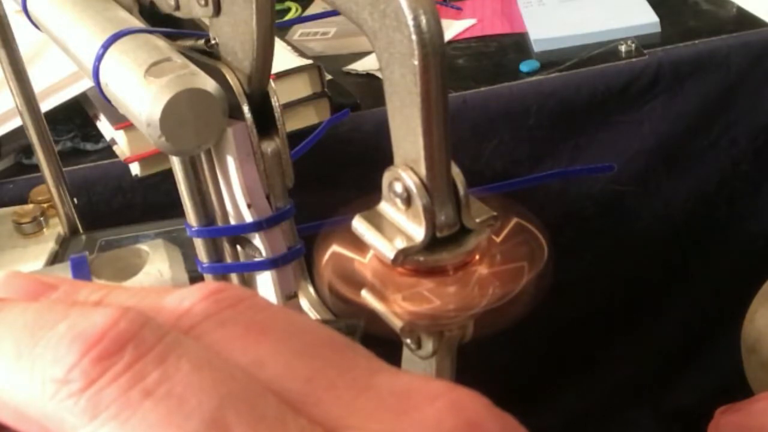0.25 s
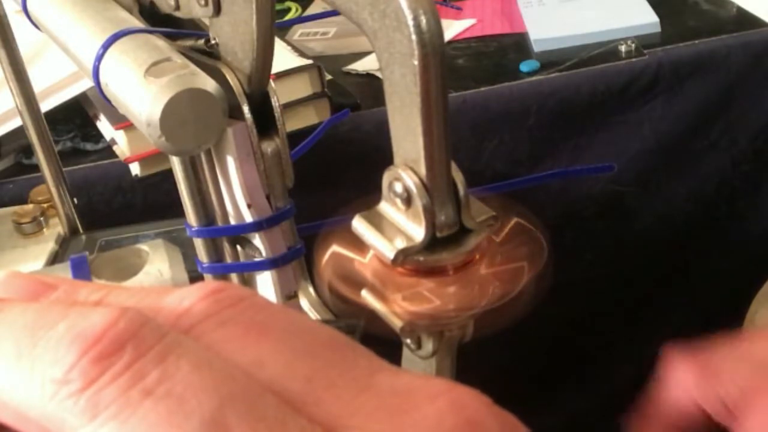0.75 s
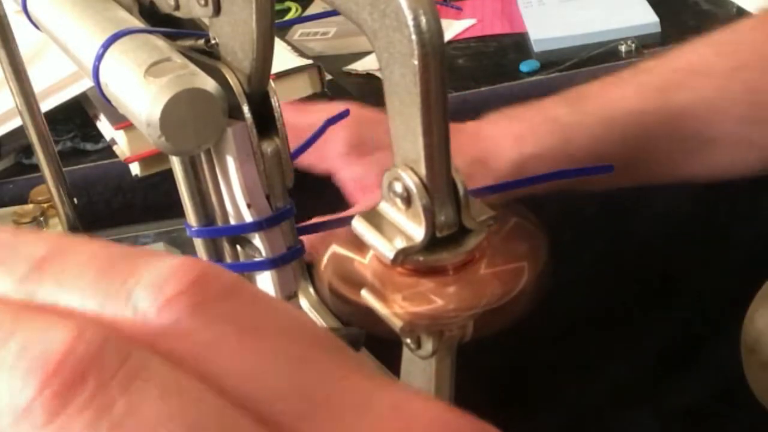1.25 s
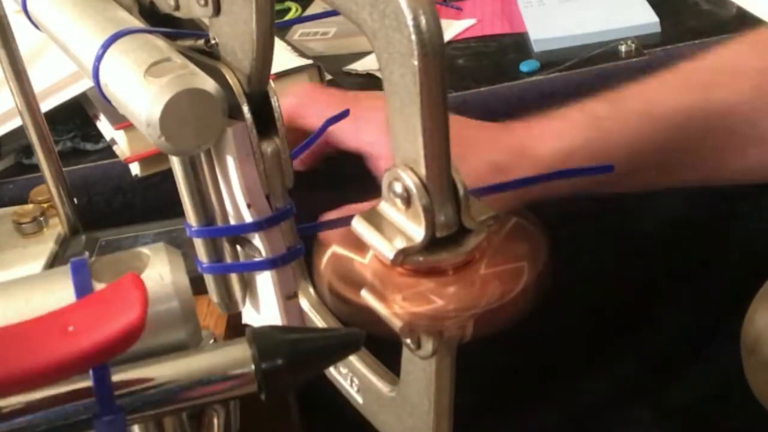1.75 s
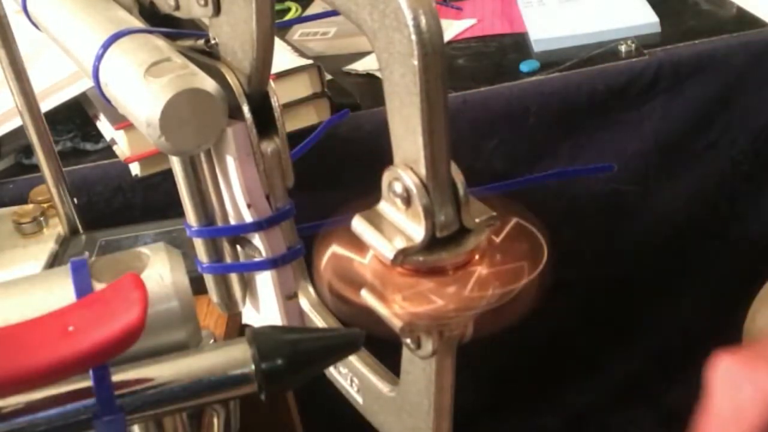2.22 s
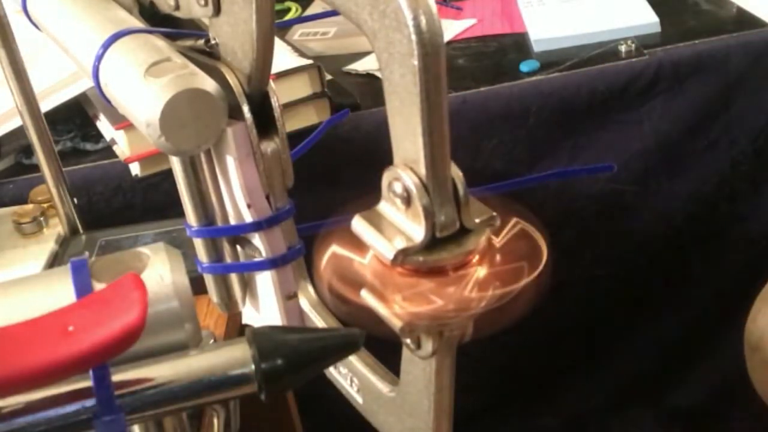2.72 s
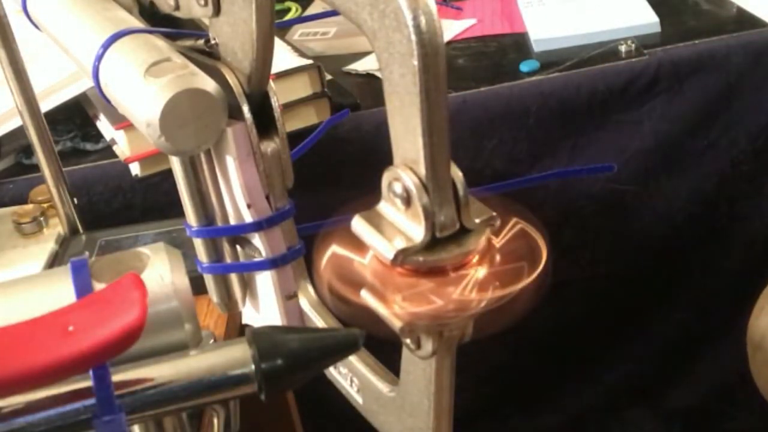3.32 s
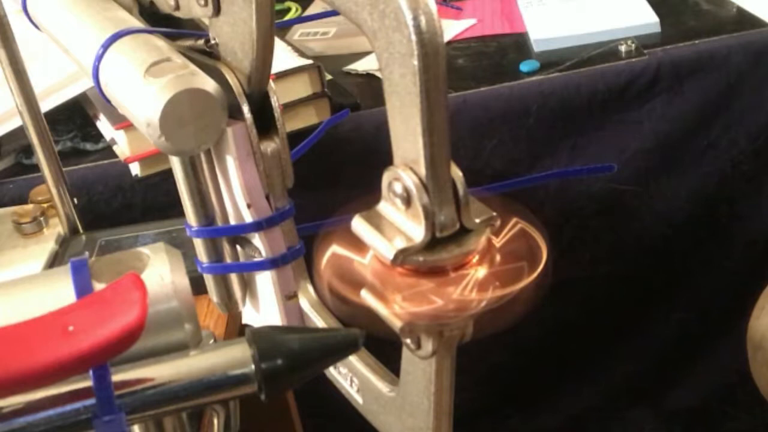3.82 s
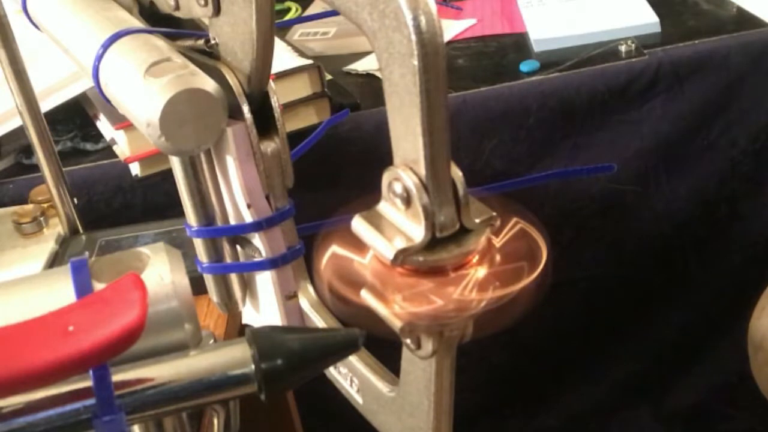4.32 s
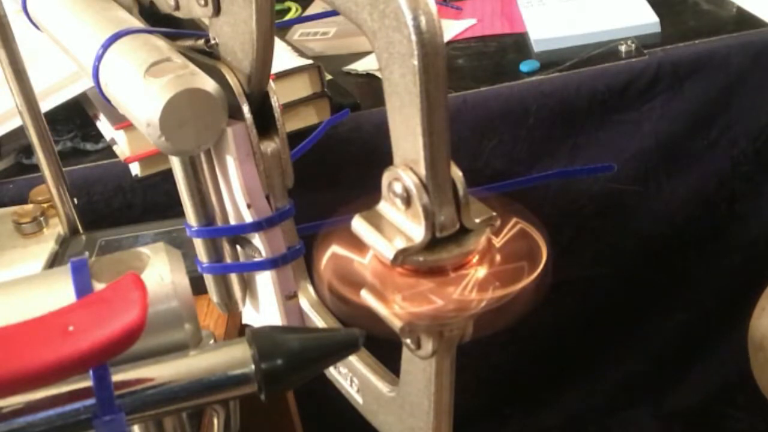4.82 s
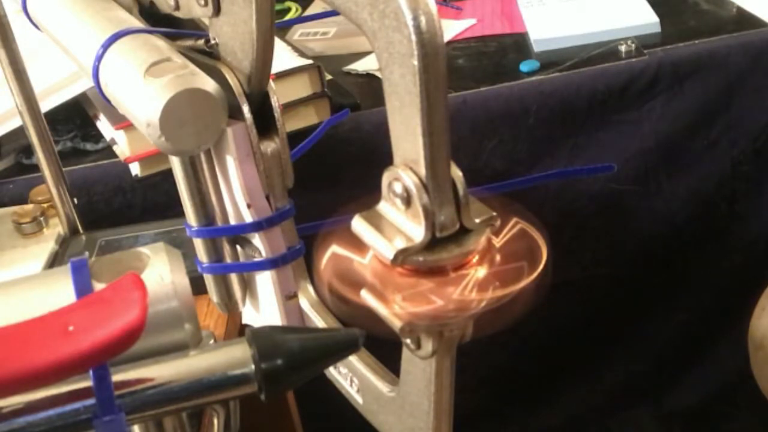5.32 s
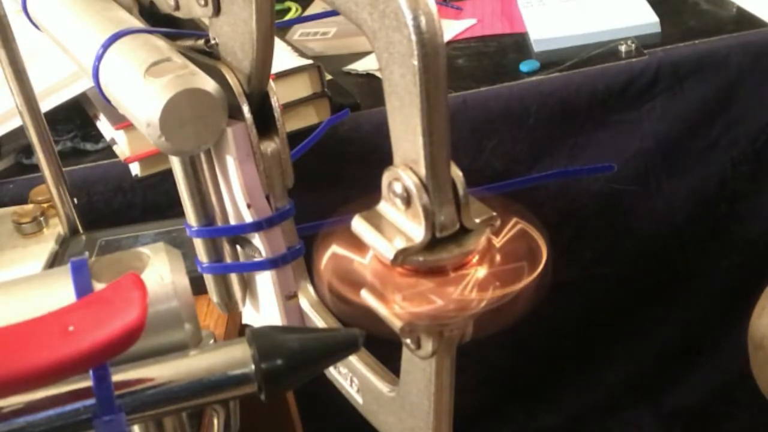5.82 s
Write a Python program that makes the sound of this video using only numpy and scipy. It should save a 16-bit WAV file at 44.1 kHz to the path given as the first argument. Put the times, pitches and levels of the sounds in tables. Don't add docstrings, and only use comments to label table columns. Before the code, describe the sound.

A loud air jet hisses onto a whirring metal spinner, cuts off with two small ticks, leaving a quiet steady hum and faint bearing whine.

```python
import sys
import numpy as np
from scipy import signal
from scipy.fft import rfft, irfft
from scipy.io import wavfile
from scipy.ndimage import uniform_filter1d

SR = 44100
rng = np.random.default_rng(int(sys.argv[2]) if len(sys.argv) > 2 else 0)


def output_pcm(signal):
    pcm = np.clip(np.atleast_2d(signal).T, -1, 1) * 32767
    wavfile.write(sys.argv[1], SR, np.round(pcm).astype(np.int16))


def invert_db(level):
    return 10 ** (np.asarray(level, dtype=float) / 20)


N = 267246
T = np.arange(N) / SR

JET_SHUT_S = 1.1755
GAIN_SETTLES_S = 3.06
CAGE_TURNS = .29575


def unit(x):
    return x / np.sqrt(np.mean(x ** 2))


def walk(rate_hz):
    k = max(int(SR / rate_hz), 1)
    return unit(uniform_filter1d(uniform_filter1d(rng.standard_normal(N), k), k))


def colour(x, points):
    hz, db = np.transpose(sorted(points))
    f = np.maximum(np.arange(N // 2 + 1) * SR / N, 1)
    curve_db = np.interp(np.log(f), np.log(hz), db)
    return unit(irfft(rfft(x) * invert_db(curve_db), N))


def patchy(points, flicker_db, rate_hz):
    spectrum = rfft(colour(rng.standard_normal(N), points))
    half_octave = 2 * np.log2(np.maximum(np.arange(len(spectrum)) * SR / N, 1) / 20)
    out = np.zeros(N)
    for k in range(21):
        band = np.clip(1 - np.abs(half_octave - k), 0, 1)
        out += irfft(spectrum * band, N) * invert_db(flicker_db * walk(rate_hz))
    return unit(out)


def swell(at, length):
    return np.exp(-4 * np.abs((T - at) / length) ** 2.6)


def stack(turns, orders, shake_db, rate_hz):
    out = np.zeros(N)
    for multiple, db, drift_db in orders:
        level = invert_db(db + drift_db * T + shake_db * walk(rate_hz))
        out += level * np.sqrt(2) * np.sin(2 * np.pi * (multiple * turns + rng.random()))
    return out


def gained(level_db, ducked_db, open_s, settle_db, fade_db_per_s):
    shut = np.interp(T, [1.26, open_s], [1, 0])
    settled = np.interp(T, [GAIN_SETTLES_S, GAIN_SETTLES_S + 0.087], [0, 1])
    fade_db = fade_db_per_s * np.maximum(T - open_s, 0)
    return level_db + ducked_db * shut + settle_db * settled + fade_db


def lobe_hz():
    coast = np.maximum(T - JET_SHUT_S, 0)
    driven_hz = 251.4 + 20.0 * T
    steady_hz = 274.16 * np.exp(-.02022 * coast)
    swirl_hz = .8 * np.exp(-coast / .25)
    return np.where(T < JET_SHUT_S, driven_hz, steady_hz + swirl_hz)


def reverberate(x, t60=0.21, wet_db=-13):
    t = T[:SR // 2]
    tail = rng.standard_normal(len(t)) * np.exp(-np.log(1000) * t / t60) * np.clip(t / 0.0015, 0, 1)
    dull = signal.sosfilt(signal.butter(1, 5000, fs=SR, output="sos"), tail)
    tail = dull + (tail - dull) * np.exp(-t / 0.031)
    tail = signal.sosfilt(signal.butter(2, 500, "high", fs=SR, output="sos"), tail)
    return x + invert_db(wet_db) * signal.fftconvolve(x, tail / np.sqrt(np.sum(tail ** 2)))[:N]


def building_drones():
    # centre [s], length [s], pitch [Hz], level [dB].
    drones = [
        (1.64, 0.45, 113, -59.5),
        (2.33, 0.81, 92, -67),
        (1.94, 0.19, 69, -64),
    ]
    out = np.zeros(N)
    for at, length, hz, db in drones:
        out += invert_db(db) * np.sqrt(2) * swell(at, length) * np.sin(2 * np.pi * hz * T)
    return out


def room_rumble():
    # frequency [Hz], level per Hz [dB].
    rumble_colour = [(15, -58.5), (25, -28), (67, -6), (81, -5.5), (216, -7), (224, 1), (230, -7.5),
                     (300, -17), (510, -120)]
    # centre [s], length [s], rise of the rumble [dB].
    arm_moves = [
        (1.95, 0.53, 4.5),
        (2.75, 0.56, 4),
    ]
    rumble_db = gained(level_db=-65, ducked_db=-4, open_s=1.5, settle_db=-1, fade_db_per_s=-0.3)
    rumble_db = rumble_db + sum(db * swell(at, length) for at, length, db in arm_moves)
    return patchy(rumble_colour, flicker_db=1.5, rate_hz=4.6) * invert_db(rumble_db + 0.16)


def handle_clicks():
    # frequency [Hz], level [dB], 60 dB decay time [s].
    handle_rings = [(2700, -3, .014), (2300, -4, .005), (3500, -1, .005), (4500, -1, .005),
                    (5800, -1, .005), (7500, -4, .004)]
    # start [s], peak level [dB].
    ticks = [
        (1.297, -50),
        (1.3075, -41),
    ]
    t = T[:SR // 10]
    tick = np.zeros(len(t))
    for hz, db, t60 in handle_rings:
        tick += invert_db(db) * np.sin(2 * np.pi * hz * t) * np.exp(-np.log(1000) * t / t60)
    crack = uniform_filter1d(np.diff(rng.standard_normal(len(t) + 1)), size=3)
    tick += 1.3 * crack * np.exp(-t / 0.00041)
    out = np.zeros(N)
    for at, db in ticks:
        start = int(at * SR)
        out[start:start + len(t)] += invert_db(db) * tick / np.abs(tick).max()
    return out


def rolling_hiss(hiss_db):
    # frequency [Hz], level per Hz [dB].
    bearing_colour = [(1760, -39), (3000, -14), (4100, 10), (5100, -11), (6300, -16), (8500, -10),
                      (10500, -2), (11000, 11), (13200, 7), (15800, -3.5)]
    # frequency [Hz], width [Hz], level against the hiss [dB].
    race_modes = [(7750, 400, -11), (10975, 25, -17), (11495, 25, -16)]
    out = patchy(bearing_colour, flicker_db=.3, rate_hz=12) * invert_db(hiss_db + 2)
    for hz, width, db in race_modes:
        b, a = signal.iirpeak(hz, hz / width, SR)
        ringing = unit(signal.lfilter(b, a, rng.standard_normal(N)))
        out += invert_db(hiss_db + db + 3.2 * walk(3)) * ringing
    return out


def ball_tones(turns, hiss_db):
    # frequency [Hz], half width [Hz], level [dB], lift of the lower and cut of the upper sideband [dB].
    crossed_rings = [(2135, 22, -77, 0), (2885, 20, -79, 0), (3090, 20, -80, 2), (3755, 50, -84, 7),
                     (3845, 45, -85, -7), (4058, 20, -76, 0), (4370, 25, -82, 0), (4500, 22, -82, 3),
                     (5265, 58, -79, 0), (5970, 95, -82, 1), (6112, 38, -73, 4), (6270, 40, -87, -2),
                     (6395, 40, -79, -1), (6660, 35, -89, 2),
                     (9850, 40, -90, 0), (11130, 40, -85, -2), (11280, 60, -88, -4), (11540, 45, -88, -4),
                  (11985, 45, -87, 3), (12125, 45, -85, -2), (12290, 35, -89, -4), (12500, 40, -88, 3),
                  (12700, 45, -80, 5), (12850, 45, -85, -3), (13010, 40, -91, -2), (13570, 55, -87, -3),
                  (13710, 40, -87, -4), (14350, 40, -92, 3)]
    cage = 2 * np.pi * CAGE_TURNS * turns
    cage_hz = CAGE_TURNS * lobe_hz()
    opened = invert_db(np.minimum(hiss_db - hiss_db[-1], 2))
    tremble = walk(60)
    axis_hz = np.arange(SR // 2)
    response = {-1: np.zeros(SR // 2), 1: np.zeros(SR // 2)}
    for side in response:
        for hz, width, db, lean_db in crossed_rings:
            response[side] += invert_db(db - side * lean_db) * np.exp(-((axis_hz - hz) / width) ** 2)
    out = np.zeros(N)
    for balls in range(30, 200, 10):
        for side in (-1, 0, 1, 5):
            multiple = balls + side
            size = invert_db(hiss_db - 20 + balls / 42 + 4.5 * walk(5))
            flutter = np.roll(tremble, rng.integers(N))
            if abs(side) == 1:
                swelling = np.interp(multiple * cage_hz, axis_hz, response[side]) * opened
                size = size + np.sqrt(2) * swelling * invert_db(balls / 90 - 1.8 + 1.5 * flutter)
            out += size * np.sin(multiple * cage + 2 * np.pi * rng.random() + 0.24 * flutter[::-1])
    return out


def ball_squeals(turns):
    # centre [s], length [s], multiple of the cage rate, level [dB].
    flares = [(4.34, .27, 96.61, -76), (4.3, .34, 100, -76), (4.27, .36, 103.37, -74), (2.19, .19, 138, -74),
              (2.18, .16, 144.79, -71), (2.19, .19, 148.18, -83), (3.93, .21, 150, -83),
              (4.86, .16, 146, -86), (5.58, .16, 148, -79), (5.56, .19, 154.76, -81), (1.83, .23, 160, -82),
              (2.1, .62, 110, -86)]
    cage = 2 * np.pi * CAGE_TURNS * turns
    tremble = walk(60)
    out = np.zeros(N)
    for at, length, multiple, db in flares:
        near = slice(max(int((at - 2 * length) * SR), 0), int((at + 2 * length) * SR))
        flutter = np.roll(tremble, rng.integers(N))[near]
        level = invert_db(db - 1.5 + multiple / 45 + 2.2 * flutter) * np.sqrt(2)
        tone = np.sin(multiple * cage[near] + .5 * flutter[::-1])
        out[near] += level * swell(at, 1.4 * length)[near] * tone
    return out


def bearing(turns):
    hiss_db = gained(level_db=-74, ducked_db=-18, open_s=1.47, settle_db=-4, fade_db_per_s=.1)
    hiss_db = hiss_db + swell(GAIN_SETTLES_S + .05, 0.073)
    return rolling_hiss(hiss_db) + ball_tones(turns, hiss_db) + ball_squeals(turns)


def stirred_air():
    # frequency [Hz], level per Hz [dB].
    air_colour = [(180, -55.5), (300, -8.5), (508, -8), (553, -10.5), (1050, -11.5), (3320, -27),
                  (3830, -24.5), (4880, -31.5), (6040, -29.5), (9000, -37), (11700, -51), (19800, -120)]
    air_db = gained(level_db=-65.5, ducked_db=-9, open_s=1.58, settle_db=0.23, fade_db_per_s=-0.88)
    return patchy(air_colour, flicker_db=1.3, rate_hz=19) * invert_db(air_db + 7.5)


def lobe_hum(turns):
    # multiple of the lobe rate, level [dB], drift [dB per s].
    hum_orders = [(.9, -24, 0), (1, 0, 0), (2, -29, 2.2), (3, -30, 0), (4, -31, 0)]
    hum_db = gained(level_db=-45, ducked_db=-12.5, open_s=1.6, settle_db=-2.5, fade_db_per_s=-0.25)
    return stack(turns, hum_orders, shake_db=0.84, rate_hz=68) * invert_db(hum_db)


def gust(at, hz):
    cycles = (T - at) * hz
    return np.exp(-np.abs(cycles) / .5) * np.cos(np.pi * cycles) * np.tanh(-cycles / 0.042)


def wind_on_microphone():
    # time [s], peak level [dB], pitch [Hz].
    strikes = [
        (0.091, -29, 106),
        (0.266, -27.5, 100),
        (0.6525, -23, 100),
        (0.688, -27.5, 152),
        (0.7111, -30, 90),
        (0.722, -34, 80),
        (0.929, -32.5, 60),
        (.95, -35, 90),
        (1.101, -25, 88),
    ]
    buffet_colour = [(15, -36.0), (35, -6.5), (75, -4.5), (200, -8.5), (400, -16.5), (900, -31)]  # Hz, dB
    buffet = colour(rng.standard_normal(N) * invert_db(1.63 * walk(60)), buffet_colour)
    return buffet * invert_db(-43.0) + sum(invert_db(db) * gust(at, hz) for at, db, hz in strikes)


def jet(turns):
    # frequency [Hz], level per Hz [dB].
    jet_colour = [(180, -31), (300, -9), (450, -13), (1000, -8), (2050, -9.5), (3000, -6.5), (4900, -6.5),
                  (7600, -8), (9600, -2.5), (10500, -8), (12000, -2.5), (14000, -3.5), (15800, -5)]
    # multiple of the lobe rate, level [dB], drift [dB per s].
    jet_orders = [(1, 0, 0), (2, -4, -1), (3, -2.5, -5), (4, -.5, -3), (5, -12.5, -1), (6, -6, 1.5),
                  (7, -4.5, -6), (9, -17, 2.5), (10, -14, -1.5), (11, -21, 11), (12, -11, 0)]
    puff = 1 + 0.22 * np.cos(2 * np.pi * turns) + 0.084 * np.cos(4 * np.pi * turns + 0.64)
    eddies = invert_db(0.69 * walk(700) + 0.13 * walk(41))
    hiss = colour(rng.standard_normal(N) * puff * eddies, jet_colour) * invert_db(-26.5 + 1.56)
    tone = stack(turns, jet_orders, shake_db=1.46, rate_hz=42) * invert_db(-39 + .9 * T)
    valve = np.clip((JET_SHUT_S - T) / .015 + .5, 0, 1)
    return (hiss + tone + wind_on_microphone()) * valve


def scene():
    turns = np.cumsum(lobe_hz()) / SR
    background = building_drones() + room_rumble()
    spinner = bearing(turns) + stirred_air() + lobe_hum(turns)
    loud = reverberate(jet(turns) + handle_clicks())
    return (background + spinner + loud)[None]


def band_limit(x):
    return signal.sosfilt(signal.butter(12, 17080, fs=SR, output="sos"), x)


def record(dry):
    top_cut = signal.ellip(14, .2, 80, 15700, fs=SR, output="sos")
    mix = signal.sosfilt(top_cut, dry)
    return band_limit(mix)


dry = scene()
out = record(dry)
output_pcm(out)
```